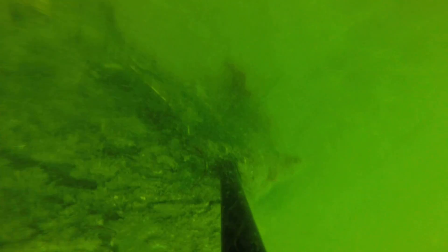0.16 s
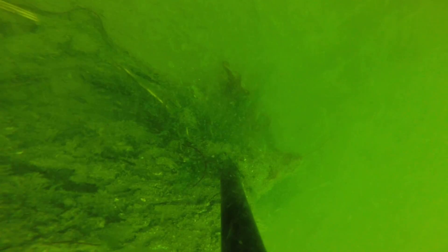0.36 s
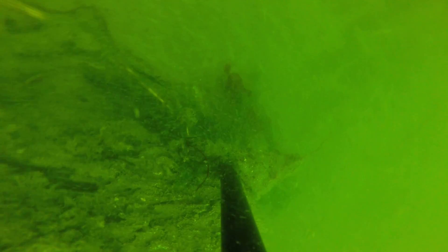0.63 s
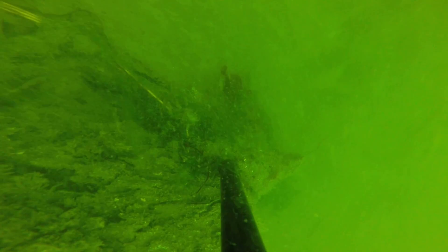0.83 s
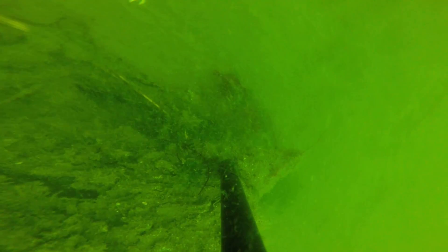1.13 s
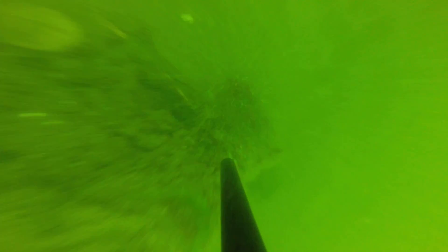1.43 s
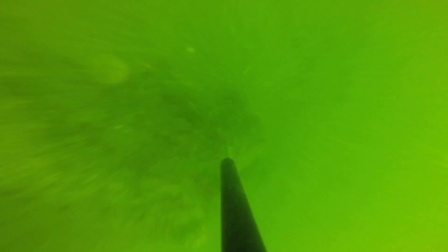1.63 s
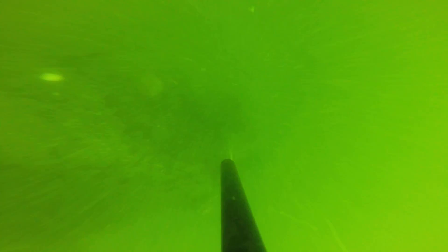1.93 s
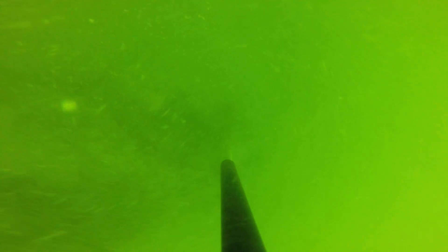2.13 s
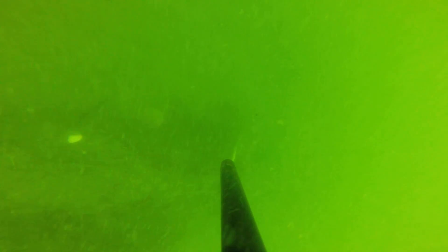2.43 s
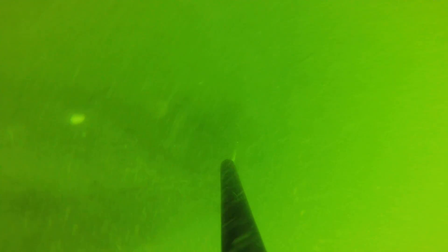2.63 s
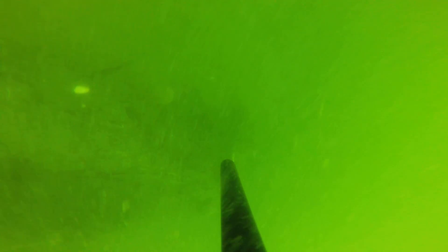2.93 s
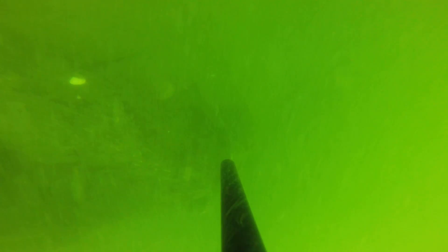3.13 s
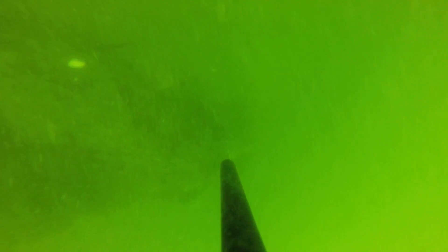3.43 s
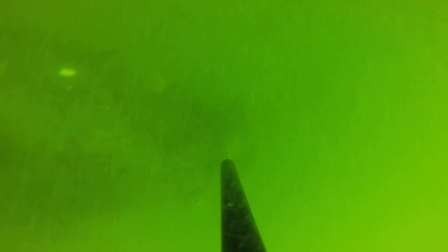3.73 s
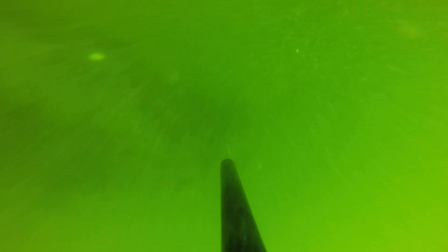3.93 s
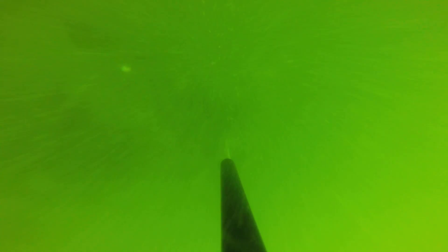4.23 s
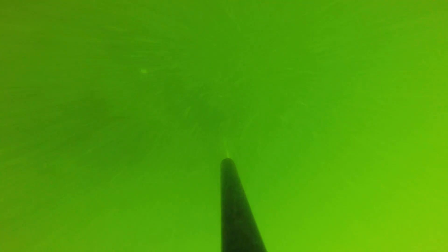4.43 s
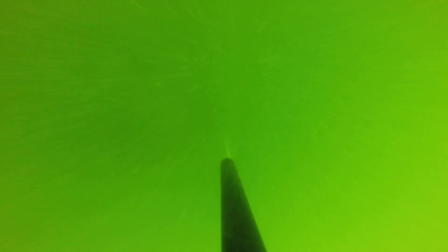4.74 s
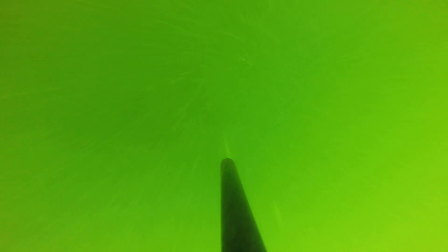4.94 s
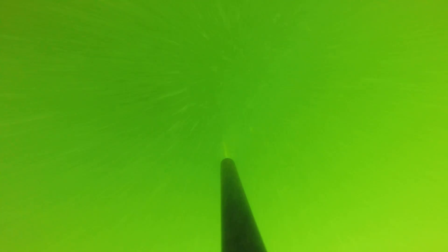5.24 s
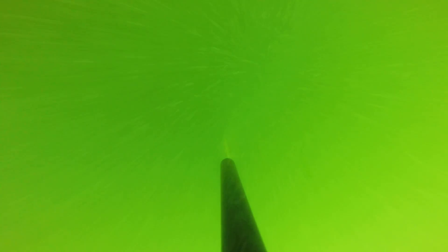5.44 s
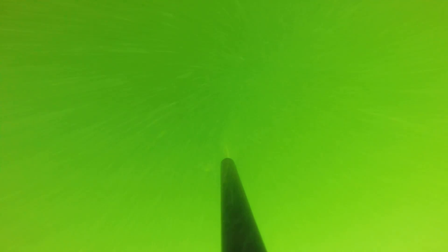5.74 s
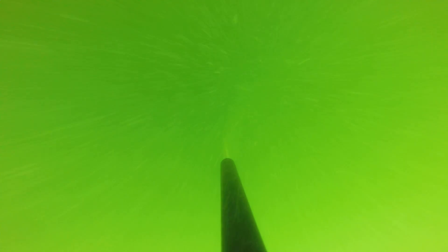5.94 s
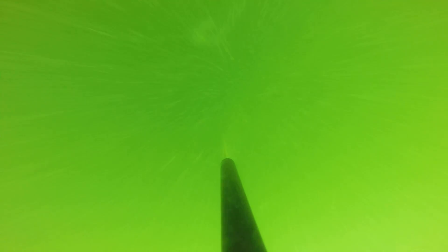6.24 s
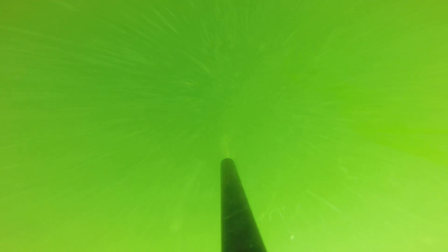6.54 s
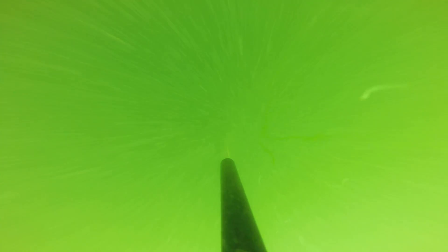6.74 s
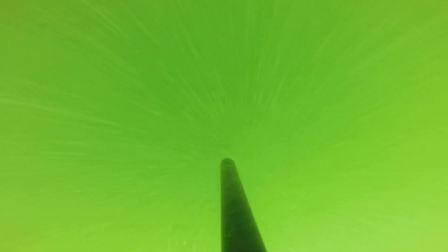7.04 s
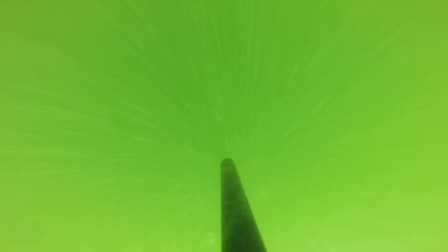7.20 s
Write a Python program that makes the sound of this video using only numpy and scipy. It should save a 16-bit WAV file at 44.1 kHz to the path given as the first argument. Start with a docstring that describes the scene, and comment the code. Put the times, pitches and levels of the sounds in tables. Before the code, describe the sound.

Underwater, a camera in a sealed housing rides on a long shaft. A brief scrape and two deep thumps give way to near quiet. Then muffled gurgling and rubbing surge with a low hum, and die back. After another heavy thump, the gurgling and scraping return and carry on, with a wavering hum, light knocks and tiny gritty ticks. A broad rush rises near the end. Everything sounds close and enclosed.

```python
"""Under murky water, a camera in a sealed housing rides on a long shaft.
The shaft sways at its lowest note and is bumped three times. While it is swept along, friction excites
its bending modes, a hum swells at its second note, grains tick on the housing and water gurgles round it.
A broad rush rises toward the end. Beneath lie small bubbles, the hiss of still water and a faint
whine of the electronics."""
import sys
import numpy as np
from scipy import signal
from scipy.io import wavfile
from scipy.ndimage import uniform_filter1d, minimum_filter1d

SR = 44100
rng = np.random.default_rng(int(sys.argv[2]) if len(sys.argv) > 2 else 0)


def wrap_up_sound(samples):
    """Save the sound to the file named by the first command line argument, as 16-bit audio."""
    columns = np.atleast_2d(samples).T
    # keep every value between -1 and 1, then stretch to whole-number steps
    tamed = np.clip(columns, -1, 1)
    steps = np.round(tamed * 32767).astype(np.int16)
    wavfile.write(sys.argv[1], SR, steps)


N = 325017

# Strength of the shaft's sway: time_s, level_db
SWAY_LEVELS = [(0, -19.5), (.12, -25), (.3, -39), (.55, -60), (1.01, -54.5), (1.22, -32), (1.36, -12.5),
               (1.63, -29), (2.15, -31), (2.3, -24), (2.44, -40.5), (2.52, -30), (2.67, -52), (2.83, -25.5),
               (3.44, -29.5), (3.7, -32.5), (4.0, -20.5), (5.1, -27), (5.5, -24), (5.6, -21.5), (6.05, -23),
               (6.5, -23.5), (6.88, -18), (7.05, -25.5), (7.37, -19)]
# Swells of the hum, rise and fall timed over 20 dB: peak_s, level_db, rise_s, fall_s, pitch_hz
HUM_SWELLS = [(1.581, -8.5, 0.2046, 0.12, 143), (3.069, -39.5, 0.399, 0.3926, 137.2),
              (4.161, -25.5, .15, 0.067, 141.1), (4.72, -12.5, .4, 0.27, 139),
              (5.07, -11.5, 0.053, 0.2, 139), (5.27, -16.5, 0.11, 0.047, 155),
              (5.51, -13, 0.12, 0.084, 141), (5.72, -17, 0.095, .14, 144), (6.2, -18, 0.21, 0.44, 142),
              (6.822, -19.5, 0.14, 0.22, 153), (7.142, -19, 0.11, 0.13, 152)]
# Bumps on the shaft: start_s, level_db, pitch_hz, swing_lead_s, rattle_db, slosh_db, ring_db
SHAFT_BUMPS = [(0.148, 2.5, 34.4, 0.011, -26, -24, -54), (0.23, -2.5, 33.2, 0.0056, -24.5, -28, -45),
               (3.483, 8, 45.3, -.006, -25.5, -10, -29.5)]
# Bending modes of the shaft: centre_hz, width_hz, peak_db
SHAFT_MODES = [(445, 23, -5), (828, 23, -14), (1340.6, 19.7, 2), (1891, 48, -10), (1968, 22.4, -3),
               (2633, 104, -16), (2758, 11, -27.5), (3521, 140, -28), (4410, 150, -38.5), (5400, 83, -44.5),
               (6070, 37, -32), (8370, 430, -53), (9140, 40, -71.5)]
# Spectrum of the friction between the modes: frequency_hz, relative_db
FRICTION_SPECTRUM = [(450, -28.5), (600, -24), (1100, -30), (2300, -25.5), (2900, -32), (3300, -46.5),
                     (4000, -47), (5000, -54), (7000, -51), (7600, -60.5), (10000, -58), (10600, -82.5),
                     (12500, -69), (15000, -98)]
# Motion through the water: time_s, rubbing_db, gurgle_db, rubbing_brightness (0 to 1)
SWEEP_LEVELS = [(0, -21, -28.5, 0.5), (.13, -25.5, -32.5, 0.9), (.19, -48, -45, 1), (.33, -70.5, -65, 0.6),
                (1.15, -72, -58, 0.6), (1.3, -41, -49.5, 1), (1.44, -20, -18, 0.41), (1.7, -22, -27, .75),
                (2.03, -25, -22.5, 0.6), (2.2, -29.5, -41.5, .7), (2.3, -62, -59, .47),
                (2.72, -77, -57, 0.9), (2.85, -49, -55, 1), (3.2, -46.5, -48, .95), (3.3, -62.5, -44, 0.7),
                (3.65, -67, -52.5, 0.2), (3.86, -40, -44, 0.8), (3.98, -33.5, -39.5, 1),
                (4.05, -20.5, -18, 0.3), (4.64, -21.5, -21.5, 0.41), (4.86, -25, -26, 0.27),
                (5.27, -20, -21.5, 0.23), (5.9, -18, -22.5, 0.03), (6.25, -20, -19, 0.39),
                (6.65, -19, -26, 0.4), (7.07, -19, -16.5, 0.25), (7.37, -21, -16, .29)]
# Brief dips in rubbing, grit, gurgle and bubbles: centre_s, depth_db
SWEEP_LULLS = [(5.419, 4.5), (5.563, 8.5), (5.66, 6.5), (6.106, 8.5), (6.31, 2.5)]
# Knocks where the rubbing catches: start_s, peak_db, tilt_db_per_octave
FRICTION_KNOCKS = [(4.375, -8.5, 4.5), (4.4295, -5.5, -8), (4.558, -10, -7.5), (4.6485, -5.5, -8),
                   (4.7142, -14.5, -5.5), (4.913, -17, -12), (5.1407, -8, -8), (5.2208, -5.5, -4),
                   (5.2759, -8.5, -8), (5.8747, -14, 2), (5.959, -18.5, 8), (6.1, -15.5, 1.5),
                   (6.767, -7.5, -10.5), (6.8565, -20.5, -22), (7.039, -4.5, 3.5)]
# Grains striking the housing: start_s, level_db, pitch_hz
GRAIN_TICKS = [(.060, -24, 6080), (1.5105, -26, 4500), (1.7427, -25, 4500), (1.771, -20, 4530),
               (1.772, -34, 13500), (4.669, -41, 11000), (4.828, -40, 11500), (5.2525, -43, 10000),
               (5.9534, -35, 9000), (6.0272, -32, 4500), (6.028, -36, 13000), (6.470, -42, 11000),
               (7.049, -32, 7500), (7.099, -29, 5500), (7.1966, -30, 6950), (7.223, -19.5, 5250),
               (7.3125, -29, 8500)]
# Spectrum of water flowing round the housing: frequency_hz, relative_db
GURGLE_SPECTRUM = [(60, -21), (105, -17), (200, -2), (280, 2.5), (450, 4), (500, -15), (545, -34),
                   (620, -51), (1500, -110)]
# Strength of the broad rush: time_s, level_db
RUSH_LEVELS = [(0, -68), (6.2, -53.5), (6.8, -32.5), (7.37, -30)]
# Spectrum of still water: frequency_hz, relative_db
STILL_WATER_SPECTRUM = [(60, -17.5), (230, 1), (480, -4.5), (700, -23.5), (1640, -1.5), (2100, -13),
                        (2350, -4.5), (3400, -17.5), (4500, -21.5), (6000, -21.5), (7500, -26.5),
                        (10000, -26), (15000, -45)]
# Tones of the electronics, before the background gain: pitch_hz, rms_db
WHINE_TONES = [(5846, -83.5), (8780, -74), (11687, -84), (11719, -79), (14626, -79)]
# Gain shared by bubbles, still water and whine: time_s, gain_db
BACKGROUND_GAINS = [(0, 5), (.15, -4), (.3, -12), (.9, 1.5), (3.5, 3.5), (4.6, 3.5), (5.5, -4), (6.2, 0),
                    (7.37, -6)]


def sway():
    """Forced vibration: eddies rumble and push the shaft's lowest mode, so its pitch wobbles."""
    pitch_hz = 42 + 2.4 * wander(2) + 5.6 * wander(11)
    swing = bending_note(pitch_hz, flutter_db=1, flutter_hz=12, overtone_db=-49)
    eddies = band_noise((28, 55), order=3)
    return amp(curves(SWAY_LEVELS)[0]) * (0.79 * swing + 0.68 * eddies)


def hum():
    """Flow-induced vibration: passing water sustains the shaft's second note, which swells at times."""
    t = np.arange(N) / SR
    rubbing_db = curves(SWEEP_LEVELS)[0]
    levels, pitches_hz = [amp(-26.5 + 0.86 * (rubbing_db + 19))], [141.1]  # between swells
    for peak_s, level_db, rise_s, fall_s, pitch_hz in HUM_SWELLS:
        from_peak = np.maximum((peak_s - t) / rise_s, (t - peak_s) / fall_s)
        levels.append(amp(level_db - 20 * from_peak ** 1.38))  # the power rounds the top
        pitches_hz.append(pitch_hz)
    level = sum(levels)
    mean_hz = np.array(pitches_hz) @ levels / level
    tone = bending_note(mean_hz + 4.4 * wander(11.8), flutter_db=2.5, flutter_hz=7.5, overtone_db=-14.5)
    buffeting = band_noise((128, 158))
    return level * (0.83 * tone + 0.45 * buffeting)


def bumps():
    """Damped transient response: the bumped shaft swings, water sloshes, the housing rattles and rings."""
    out, t = np.zeros(N), np.arange(SR // 2) / SR
    for start_s, level_db, pitch_hz, lead_s, rattle_db, slosh_db, ring_db in SHAFT_BUMPS:
        swing_time = t + lead_s * (1 - np.exp(-t / 0.0032))  # forced at first, then free
        swing = -envelope(t, rise_s=0.0022, t60_s=0.23) * np.sin(2 * np.pi * pitch_hz * swing_time)
        burst = rng.standard_normal(len(t)) * envelope(t, rise_s=0.0014, t60_s=0.07)
        slosh = amp(slosh_db) * coloured(burst, GURGLE_SPECTRUM)
        rattle = amp(rattle_db) * coloured(burst, FRICTION_SPECTRUM, tilt_db=6)
        ring = amp(ring_db) * envelope(t, rise_s=0.0018, t60_s=0.045) * np.sin(2 * np.pi * 6070 * t)
        add(out, start_s, amp(level_db) * swing + ring + slosh + rattle)
    return out


def rubbing():
    """Frictional excitation: uneven noise and many small slips drive the bending modes together."""
    grip = amp(1.5 * wander(14) + 2 * wander(70))
    slips = impulses(per_s=260, spread_db=4, cap_spreads=2.8)
    slips = signal.lfilter(*signal.butter(2, 2600, fs=SR), slips)  # finite duration dulls a slip
    force = grip * (rng.standard_normal(N) + 0.47 * unit_rms(slips))
    dull = coloured(force, FRICTION_SPECTRUM, SHAFT_MODES, tilt_db=-3.5)
    sharp = coloured(force, FRICTION_SPECTRUM, SHAFT_MODES, tilt_db=7)
    rubbing_db, _, brightness = sweep()
    return amp(rubbing_db) * unit_rms((1 - brightness) * dull + brightness * sharp)


def knocks():
    """Impulsive excitation: each catch is a short scraping force that rings the upper bending modes."""
    out, t = np.zeros(N), np.arange(800) / SR
    for start_s, peak_db, tilt_db in FRICTION_KNOCKS:
        force = rng.standard_normal(len(t)) * envelope(t, rise_s=0.0035, t60_s=0.046)
        force = signal.lfilter(*signal.butter(1, 3000, fs=SR), force)
        ring = signal.oaconvolve(force, impulse_response(FRICTION_SPECTRUM, SHAFT_MODES[1:], tilt_db)[:5000])
        add(out, start_s, amp(peak_db) * ring / abs(ring).max())
    return out


def ticks():
    """Free decay: struck by a grain, the housing rings down by 60 dB in 30 cycles."""
    out, t = np.zeros(N), np.arange(800) / SR
    for start_s, level_db, pitch_hz in GRAIN_TICKS:
        ring = envelope(t, rise_s=0.00012, t60_s=30 / pitch_hz) * np.sin(2 * np.pi * pitch_hz * t)
        add(out, start_s, amp(level_db) * ring)
    return out


def grit():
    """Shot noise: fine particles strike the moving housing at random instants."""
    strikes = impulses(per_s=35, spread_db=6, cap_spreads=4)
    patter = signal.sosfilt(signal.butter(2, (5000, 13000), "band", fs=SR, output="sos"), strikes)
    rubbing_db, _, _ = sweep()
    return amp(rubbing_db - 51) * unit_rms(patter)


def gurgle():
    """Flow noise: water works round the housing in low, irregular lumps."""
    lumps = amp(1.2 * wander(34) + 0.37 * wander(40))
    flow = coloured(lumps * rng.standard_normal(N), GURGLE_SPECTRUM)
    _, gurgle_db, _ = sweep()
    return amp(gurgle_db) * unit_rms(flow)


def rush():
    """Amplitude-modulated noise: one wide band flickers and grows toward the end."""
    return band_noise((810, 1300)) * amp(curves(RUSH_LEVELS)[0] + 2.3 * wander(27))


def bubbles(per_s=64, cycles=8.2, pitch_rise=0.1):
    """Bubble resonance: each small bubble oscillates briefly as it comes loose, gliding up a little."""
    out, pitches_hz = np.zeros(N), np.geomspace(210, 520, num=10)
    for pitch_hz in pitches_hz:
        age = np.arange(0, 1, pitch_hz / (cycles * SR))
        phase = 2 * np.pi * cycles * (age + pitch_rise * age ** 2 / 2)
        bubble = np.sin(np.pi * age) ** 2 * np.sin(phase)
        strengths = amp(3 * rng.standard_normal(N))
        onsets = rng.random(N) < per_s / len(pitches_hz) / SR
        out += signal.oaconvolve(strengths * onsets, bubble)[:N]
    _, gurgle_db, _ = sweep()
    return amp(-58 + curves(BACKGROUND_GAINS)[0] + 0.36 * (gurgle_db + 56)) * unit_rms(out)


def background():
    """Noise floor: the continuous spectrum of still water and the line spectrum of the electronics."""
    t = np.arange(N) / SR
    hiss = coloured(rng.standard_normal(N), STILL_WATER_SPECTRUM) * amp(wander(22))
    whine = sum(amp(db) * np.sqrt(2) * np.sin(2 * np.pi * hz * t) for hz, db in WHINE_TONES)
    return amp(curves(BACKGROUND_GAINS)[0]) * (amp(-56.5) * unit_rms(hiss) + whine)


def sweep():
    """Envelopes of the motion: rubbing_db and gurgle_db, less Gaussian lulls, and brightness."""
    t = np.arange(N) / SR
    rubbing_db, gurgle_db, brightness = curves(SWEEP_LEVELS)
    lull_db = sum(db * np.exp(-((t - centre_s) / 0.036) ** 2) for centre_s, db in SWEEP_LULLS)
    return rubbing_db - lull_db, gurgle_db - lull_db, brightness


def bending_note(pitch_hz, flutter_db, flutter_hz, overtone_db):
    """Random modulation: a fundamental and its octave flutter as water buffets the shaft."""
    phase = 2 * np.pi * np.cumsum(pitch_hz) / SR
    overtone = amp(overtone_db + 5.9 * wander(6.3)) * np.sin(2 * phase)
    return amp(flutter_db * wander(flutter_hz)) * np.sqrt(2) * (np.sin(phase) + overtone)


def impulse_response(spectrum, modes, tilt_db):
    """Minimum-phase response of unit energy: a smooth spectrum plus resonances, tilted in the mids."""
    hz = np.fft.rfftfreq(8192, 1 / SR) + 1
    points_hz, points_db = np.transpose(spectrum)
    power = amp(np.interp(np.log(hz), np.log(points_hz), points_db)) ** 2
    for centre_hz, width_hz, peak_db in modes:
        skirts = np.minimum(hz / centre_hz, centre_hz / hz) ** 8
        power += amp(peak_db) ** 2 / (1 + (2 * (hz - centre_hz) / width_hz) ** 2) * skirts
    octaves = np.log2(np.clip(hz, 1200, 2800) / 1500)
    log_gain = np.log(power * amp(tilt_db * octaves) ** 2 + 1e-12) / 2
    two_sided = np.r_[log_gain, log_gain[-2:0:-1]]
    taps = np.fft.ifft(np.exp(np.conj(signal.hilbert(two_sided)))).real
    return taps / np.linalg.norm(taps)


def coloured(force, spectrum, modes=(), tilt_db=0):
    """Convolution gives an excitation the spectrum of what it drives."""
    return signal.oaconvolve(force, impulse_response(spectrum, modes, tilt_db))[:len(force)]


def impulses(per_s, spread_db, cap_spreads):
    """Poisson train of impulses of random level and sign."""
    strengths = amp(spread_db * np.minimum(rng.exponential(1, N), cap_spreads))
    return strengths * (rng.random(N) < per_s / SR) * rng.choice([-1, 1], N)


def band_noise(band_hz, order=2):
    """Band-limited Gaussian noise of rms 1."""
    bandpass = signal.butter(order, band_hz, "band", fs=SR, output="sos")
    return unit_rms(signal.sosfilt(bandpass, rng.standard_normal(N)))


def wander(rate_hz):
    """Slow random fluctuation of rms near 1, its extremes clipped."""
    slow = signal.lfilter(*signal.butter(2, rate_hz, fs=SR), rng.standard_normal(N))
    return np.clip(unit_rms(slow), -2, 2)


def envelope(t, rise_s, t60_s):
    """Exponential onset and decay, 60 dB down after t60_s."""
    return (1 - np.exp(-t / rise_s)) * amp(-60 * t / t60_s)


def curves(rows):
    """Linear interpolation of a table's columns at every sample."""
    time_s, *columns = np.transpose(rows)
    return [np.interp(np.arange(N) / SR, time_s, column) for column in columns]


def amp(db):
    """Decibels to amplitude ratio."""
    return 10 ** (np.asarray(db) / 20)


def unit_rms(x):
    """Normalisation to rms 1."""
    return x / np.sqrt(np.mean(x ** 2) + 1e-20)


def add(mix, start_s, sound):
    """Superposes a sound on the mix from start_s."""
    part = mix[round(start_s * SR):][:len(sound)]
    part += sound[:len(part)]


def scene():
    """Superposition: all sources sum at one microphone in the housing."""
    shaft = sway() + hum() + bumps() + rubbing() + knocks()
    return (shaft + ticks() + grit() + gurgle() + rush() + bubbles() + background())[None]


def record(dry):
    """Peak limiting at full scale, then band limiting from 8 Hz to 15.4 kHz."""
    gain = minimum_filter1d(1 / np.maximum(abs(dry), 1), size=441)
    limited = dry * uniform_filter1d(gain, size=221)
    limited = signal.lfilter(*signal.butter(1, 8, "high", fs=SR), limited)
    lowpass = signal.firwin(511, 15400, window=("kaiser", 9), fs=SR)
    return signal.oaconvolve(limited, lowpass[None], "same")


dry = scene()
out = record(dry)
wrap_up_sound(out)
```